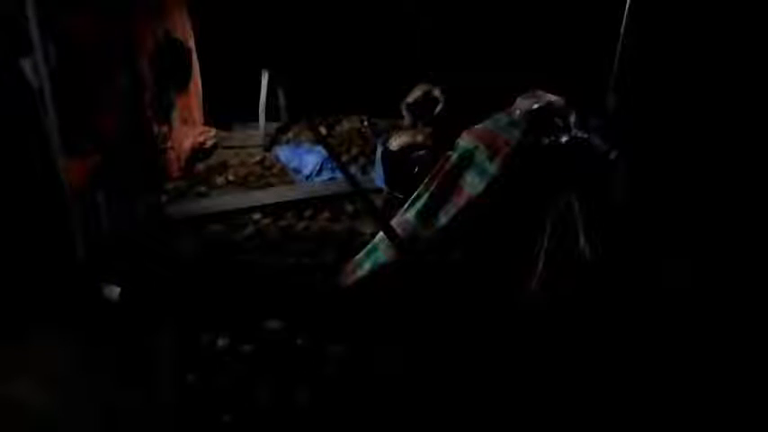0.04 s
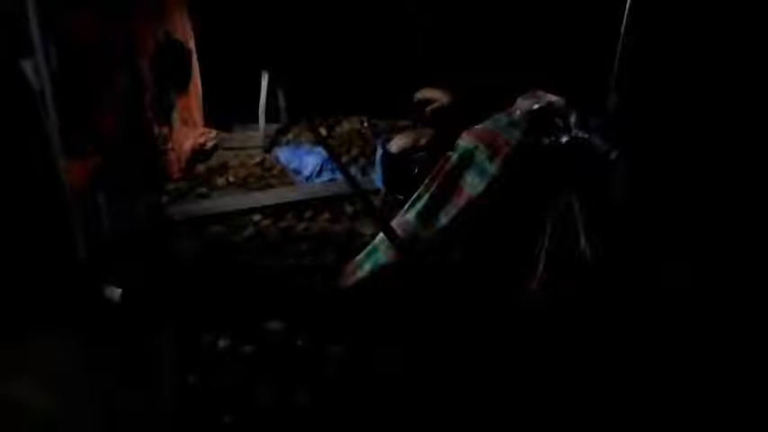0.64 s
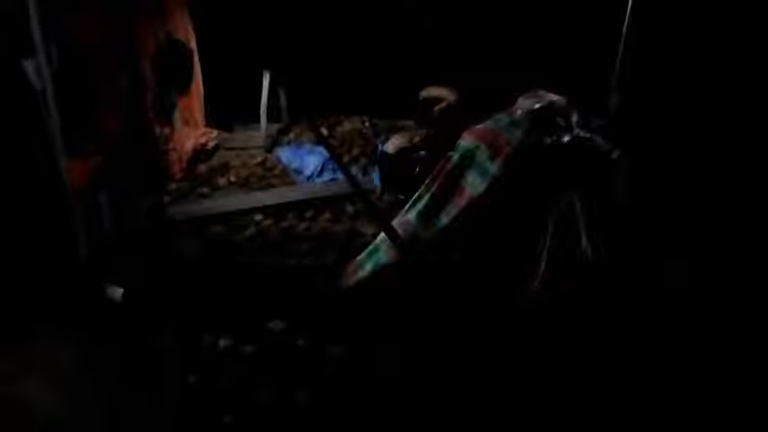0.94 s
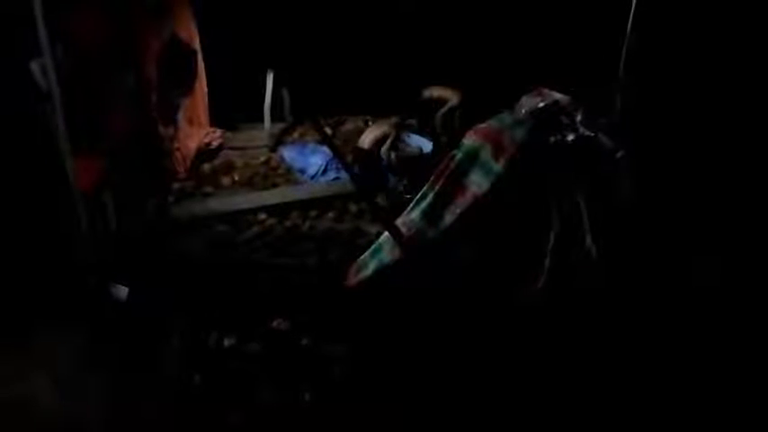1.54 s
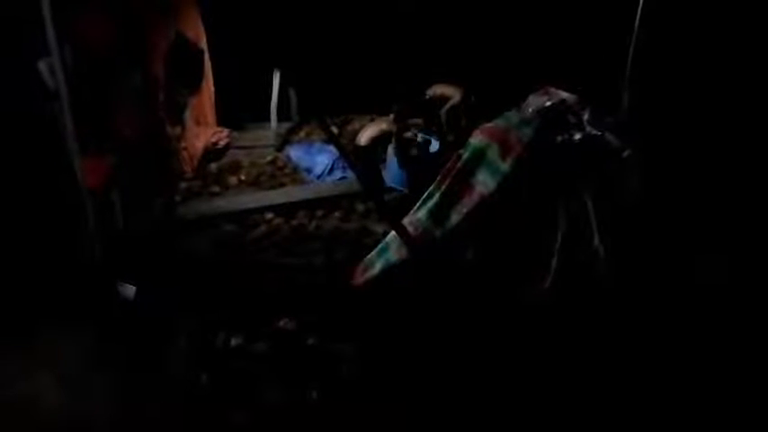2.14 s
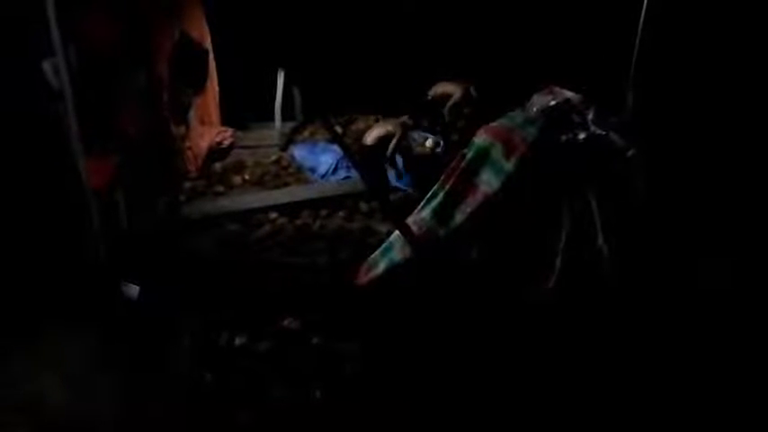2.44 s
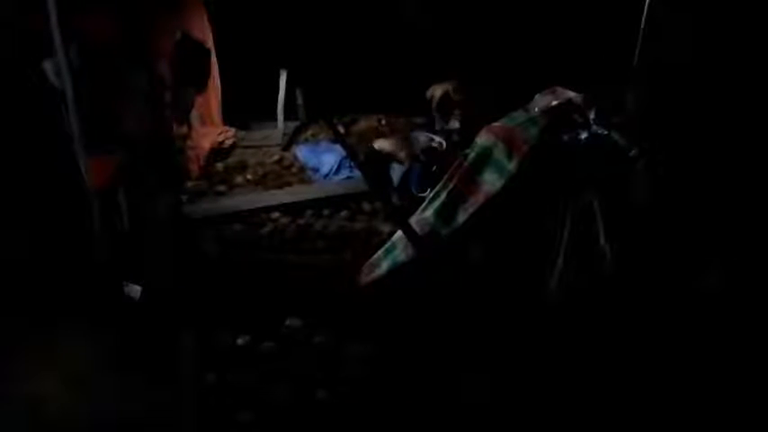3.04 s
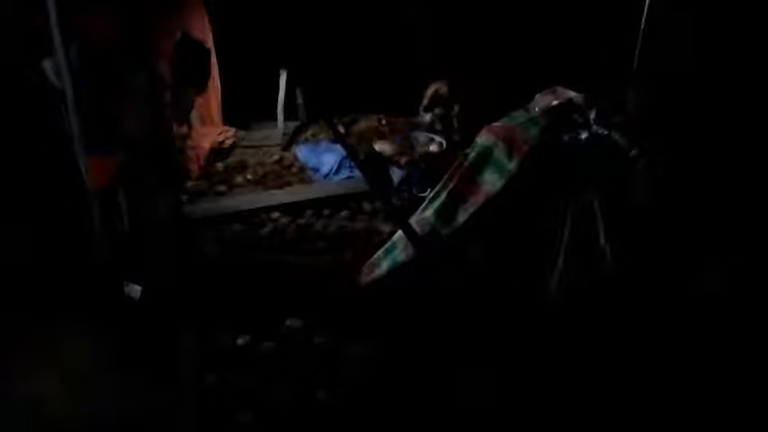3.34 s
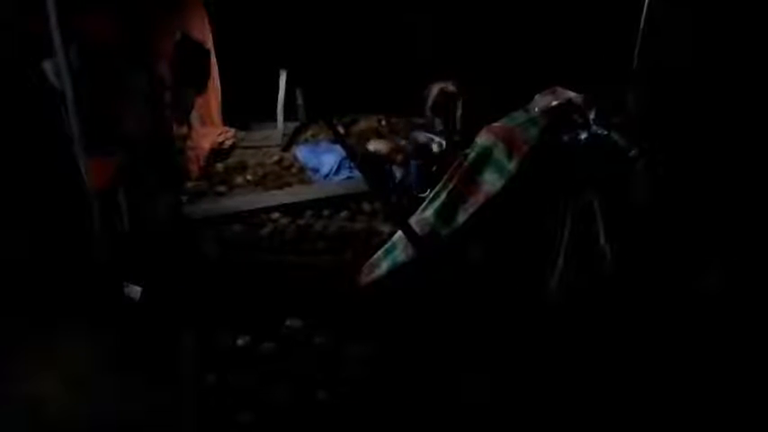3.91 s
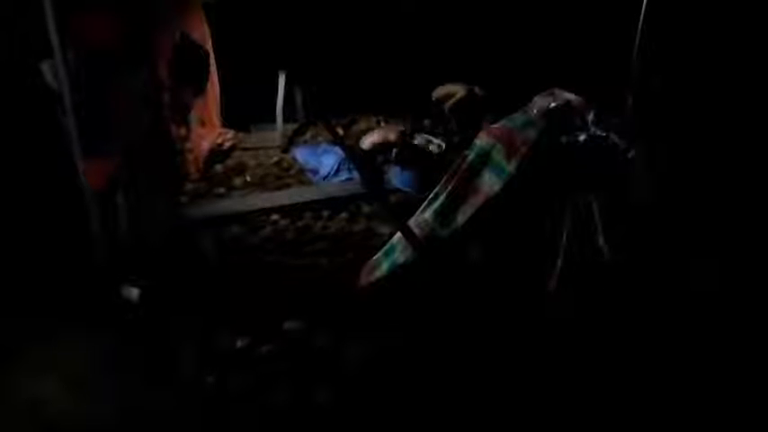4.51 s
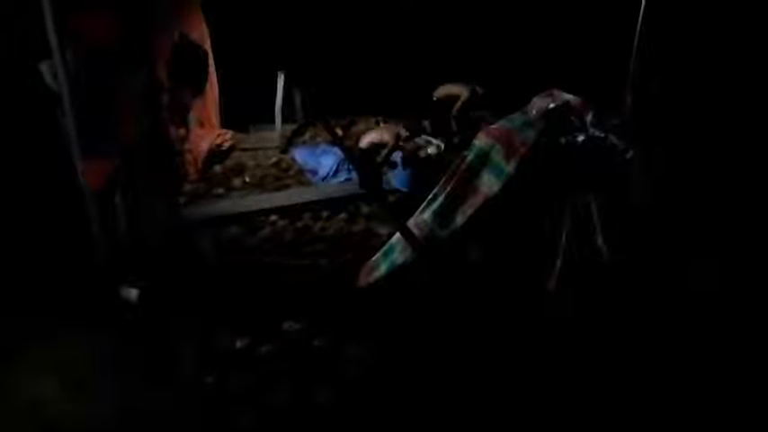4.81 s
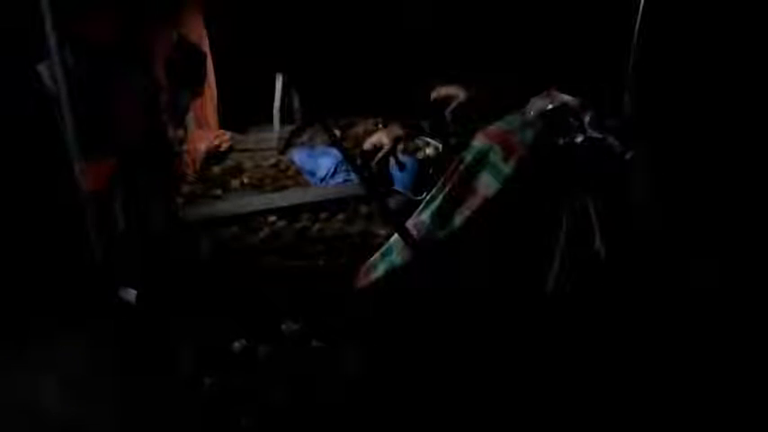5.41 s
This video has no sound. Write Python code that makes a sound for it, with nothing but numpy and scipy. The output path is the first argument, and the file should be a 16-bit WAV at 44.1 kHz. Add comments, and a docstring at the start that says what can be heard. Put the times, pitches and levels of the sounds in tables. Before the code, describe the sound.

Coconuts land on a heap with dull thuds and hollow knocks, over faint crickets and frogs at night.

```python
"""Coconuts on a heap at night

Coconuts are tossed onto a heap in a yard: one lands close on the left, bounces and rolls; others
knock farther off. Each blow is a dull husk thud and a hollow shell knock that jostles the heap and
echoes; dry fibre scuffs in between. Crickets, frogs and a bush cricket call over a faint hum.
An electrical buzz sits on the right, and the loudest blows overload."""
import sys
import numpy as np
from scipy import signal
from scipy.fft import rfft, irfft, next_fast_len
from scipy.io import wavfile
from scipy.ndimage import map_coordinates

SR = 44100
rng = np.random.default_rng(int(sys.argv[2]) if len(sys.argv) > 2 else 0)


def persist_wave(psi):
    """Save psi, clipped to +-1, as 16-bit WAV."""
    counts = np.round(np.clip(psi, -1, 1) * 32767).astype(np.int16)
    wavfile.write(sys.argv[1], SR, np.atleast_2d(counts).T)


N = 249606
TIME = np.arange(N) / SR

# Landings and bounces. Each row: start in seconds, force in dB, husk pitch in Hz, shell pitch in Hz,
# hardness as shell over husk in dB, contact time in seconds.
BLOWS = [(0.1927, -34.5, 229, 553, 7, 0.0057), (0.2015, -23, 141, 423, -15.5, .006),
         (0.223, -38, 242, 818, -1.5, 0.0064), (0.479, -44.5, 188, 657, 8.5, 0.0048),
         (1.143, -34.5, 296, 494, -39, 0.0072), (1.248, -27.5, 325, 605, -11.5, .006),
         (1.5, -27.5, 402, 547, -4, 0.0056), (1.5158, -9, 243.7, 633.6, -3, 0.0051),
         (1.5231, -13, 268, 724, -5.5, 0.0067), (1.535, -26.5, 325, 710, 5, 0.0075),
         (1.5627, -11, 250, 604, -4, 0.0031), (1.6321, -10, 219, 668, 1.5, 0.0035),
         (1.6362, -9, 172, 595, -3.5, 0.0042), (1.648, -22.5, 316, 709, 4, 0.0063),
         (1.832, -34, 185, 484, -6.5, 0.01), (1.94, -23.5, 199, 486, -14.5, 0.0062),
         (1.994, -27.5, 222, 408, -14.5, 0.0042), (2.024, -33.5, 183, 413, -23, 0.005),
         (2.124, -33, 140, 590, -16, 0.0053), (2.166, -30, 173, 440, -22, 0.0052),
         (2.308, -34, 157, 714, -20.5, 0.0057), (2.408, -41.5, 150, 450, -24, 0.0064),
         (2.458, -36, 142, 501, -25, 0.0063), (2.521, -38.5, 133, 630, -8, 0.0057),
         (2.979, -38, 400, 515, 4, .0045), (3.002, -42.5, 382, 647, -0.5, 0.0045),
         (3.059, -44.5, 297, 730, 1, 0.0051), (3.1, -50, 326, 690, 4, 0.0036),
         (3.183, -39.5, 262, 553, -7, 0.0048), (3.209, -41.5, 280, 526, -14, 0.0044),
         (3.746, -38.5, 123.8, 586, 0.5, 0.0048), (3.93, -39, 218, 590, -2.5, 0.0032),
         (3.955, -49.5, 208, 702, 1.5, 0.0076), (5.316, -47, 264, 441, -13, 0.0085)]
# The shell's overtones. Each row: ratio to the shell pitch, relative level in dB.
SHELL_MODES = [(1.42, -8), (1.829, -11.5)]
# Neighbouring shells. Each row: resonance in Hz, width in Hz, relative level in dB.
NEIGHBOUR_SHELLS = [(883, 14, 10.5), (1435, 260, 4), (1767, 156, 5.5), (1930, 240, -1), (2300, 130, -39)]
# Air spaces and shells ringing in the heap. Each row: pitch in Hz, relative level in dB.
HOLLOWS = [(191, -15), (291, -14), (335, -16), (403, -12), (491, -13), (683, -8), (762, -16), (845, -10),
           (912, -14), (945, -17), (1022, -15), (1161, -14), (1262, -14.5), (1630, -20)]
# Dry knocks of bare shell and stalk. Each row: start in seconds, pitch in Hz, relative level in dB.
CLACKS = [(0.475, 3200, -34), (0.477, 1510, -38), (1.502, 1600, -32), (1.521, 1140, -17.5),
          (1.547, 1230, -28), (1.566, 1214, -22), (1.633, 1078, -9), (1.635, 1840, -17), (2.519, 3250, -35),
          (2.545, 3390, -39), (3.715, 1560, -16), (3.7229, 1615, -22), (4.654, 1310, -35),
          (4.693, 2570, -35.5), (4.696, 1310, -34), (4.812, 1400, -43), (4.833, 1590, -39.5)]
# The ring of a clack. Each row: ratio to its pitch, relative level in dB.
CLACK_MODES = [(1.002, -8.5), (1.109, -8.5), (1.27, -22), (1.38, -23.5), (2.05, -30)]
# Nuts rolling to rest. Each row: start and length in seconds, pitch in Hz, relative level in dB.
ROLLS = [(2.049, 0.59, 219.6, -39.5), (3.019, 0.32, 465.4, -45), (5.325, 0.25, 295, -68)]
# Husks sliding on each other. Each row: start and length in seconds, relative level in dB,
# pitch of the rubbed shell in Hz, its ring over the fibre hiss in dB.
SCUFFS = [(0.269, 0.078, -54.5, 1360, 0), (0.466, 0.15, -52, 1500, -25), (0.743, .04, -64, 1550, 12),
          (1.003, 0.038, -57, 960, 13), (1.277, 0.11, -54, 1410, -2), (1.529, 0.045, -32, 990, 4),
          (1.629, 0.027, -29, 1070, 1), (2.045, 0.043, -56.5, 1720, 10), (2.301, 0.043, -55.5, 1880, 5),
          (2.504, 0.09, -48, 2880, -16), (2.818, .02, -59, 1660, 12), (2.982, 0.26, -54.5, 960, -2),
          (3.188, 0.087, -54.5, 1670, 10), (3.435, .025, -58, 1700, 8), (3.697, .025, -45, 2230, 13),
          (3.713, 0.045, -36.5, 1810, -8.5), (4.652, 0.055, -41, 1276, 10), (4.654, 0.031, -49.5, 580, 17),
          (4.688, 0.17, -50.5, 2550, -21), (4.95, 0.028, -62, 1600, 8), (5.017, 0.028, -57, 1000, 8),
          (5.13, 0.03, -60.5, 1510, 4), (5.332, 0.12, -53.5, 3170, -15)]
# The heap giving way. Each row: middle and length in seconds, relative level in dB.
SETTLES = [(0.227, 0.16, -41), (1.179, 0.12, -42.5), (1.78, 0.25, -52), (1.988, 0.085, -33),
           (2.432, 0.38, -50.5), (3.366, 0.24, -53.5), (3.816, 0.23, -49.5), (5.392, 0.14, -52)]
# Nearer callers. Each row: middle and length in seconds, pitch and width in Hz, relative level in dB.
CRICKET_TRILLS = [(0.36, 0.074, 5790, 150, -55.5), (0.64, 0.11, 6080, 130, -52),
                  (1.19, 0.12, 6060, 150, -60), (1.38, 0.39, 5950, 139, -57),
                  (3.86, 0.12, 6130, 130, -53.5), (3.99, 0.042, 6140, 130, -54),
                  (4.29, 0.042, 6120, 150, -55), (4.88, 0.25, 6040, 200, -56)]
FROG_CALLS = [(0.2, 0.12, 2420, 140, -53), (0.355, 0.058, 2400, 110, -51), (2.52, 0.26, 2373, 200, -56),
              (3.18, 0.22, 2403, 80, -52.5), (3.38, 0.18, 2410, 90, -54), (3.86, 0.28, 2230, 170, -52.5),
              (4.41, 0.071, 2380, 149, -53), (4.76, 0.22, 2326, 250, -53.5), (5.52, 0.36, 2304, 260, -51.5)]
# Bush cricket strokes. Each row: start in seconds, pitch in Hz, relative level in dB,
# brightness of the scrape in dB per octave.
WING_STROKES = [(0.069, 10950, -56.5, -4), (1.927, 10740, -54, 1), (3.684, 10800, -51, 3),
                (5.375, 10770, -53.5, 3)]
# Low background tones. Each row: pitch in Hz, relative level in dB.
DRONE_TONES = [(61, -59.5), (183.5, -66), (281, -65)]
MAINS_HARMONICS = [(200, -66.5), (300, -64.5), (400, -67.5), (500, -69)]
# The drone's swelling tone. Each row: time in seconds, relative level in dB.
DRONE_SWELL = [(0, -61), (0.7, -55.5), (1.3, -57.5), (3.7, -56), (4.2, -63), (5.1, -73), (5.5, -58.5)]

# Tone colours. Each row: frequency in Hz, relative spectral level in dB.
SNAP_COLOUR = [(200, -22.5), (800, 3), (1900, -9), (2600, -15.5), (6000, -26.5), (15000, -42)]  # husk fibres breaking
JOSTLE_COLOUR = [(30, -1.5), (80, -1), (150, 7.5), (400, 5.5), (700, -5), (1000, -12), (1500, -45),
                 (2500, -23.5), (6000, -50)]  # the shaken heap
CRACK_COLOUR = [(500, -4), (3300, 7.5), (6000, -7), (14000, -13)]  # the edge of a clack
FIBRE_COLOUR = [(300, 12), (900, 10.5), (1600, 7), (2300, 10), (3300, 9), (4000, 0.5), (5000, 2.5),
                (6500, -16), (9000, -15), (15000, -24)]  # husk rubbing husk
STIR_COLOUR = [(200, -23.5), (600, 0.5), (1000, -6), (1700, 2), (2100, -7.5), (3200, -5), (4500, -7),
               (9000, -32)]  # loose husks rustling
RUMBLE_COLOUR = [(20, -8), (40, -7.5), (70, 4), (110, -2), (200, -3), (700, -25), (4000, -49.5)]  # the settling heap
RASP_COLOUR = [(6000, -40), (8200, -12), (9500, -3), (10700, 0.5), (11500, -4), (12500, -16), (14600, -14)]  # a scraping wing
AIR_COLOUR = [(20, -50), (100, -46), (320, -10.5), (600, -7), (1000, -7.5), (1800, -16), (3100, -13.5),
              (4000, -21), (5000, -19.5), (7400, -11), (8000, -21.5), (9200, -17), (11400, -29.5),
              (12200, -32.5), (15000, -32.5)]  # outdoor hiss
BUZZ_COLOUR = [(300, -41.5), (1400, -26), (2500, -8), (3300, 4), (3900, -19.5), (4900, 2.5), (6000, -5.5),
               (6800, -47), (8000, -24), (11000, -13), (15000, -36)]  # electrical ticks
# Where the hiss sits. Each row: frequency in Hz, left over right in dB.
AIR_BALANCE = [(100, 84.5), (500, 5.5), (1200, -4.5), (3000, 7.5), (4500, -15), (7300, 3), (12000, -1.5)]
# The length of the yard's echo. Each row: frequency in Hz, seconds to fall by 60 dB.
YARD_DECAY = [(100, 0.35), (260, 0.61), (700, 0.38), (1800, 0.44), (5000, 1), (12000, 0.41)]
# The tone of that echo. Each row: frequency in Hz, gain in dB.
YARD_COLOUR = [(40, -3), (150, -3), (300, -10), (700, 1), (1500, 1), (4000, -5), (12000, 1.5)]


def coconuts():
    """Every landing, clack and roll, placed in the yard."""
    out = np.zeros((2, N))
    for start, *contact in BLOWS:
        add(out, start, place(blow(*contact)))
    for start, hz, db in CLACKS:
        add(out, start, amp(db) * place(clack(hz), left_db=28.5, echo_left_db=9, wet_db=-11))
    for start, length, hz, db in ROLLS:
        add(out, start, amp(db) * place(roll(length, hz), wet_db=-12))
    return out


def blow(force_db, husk_hz, shell_hz, hardness_db, contact_s, hard_blow_db=-7.5, hollow_t60_s=0.21):
    """One contact: the soft husk thuds, the hard shell knocks, the neighbours shake and rattle."""
    t = np.arange(SR // 3) / SR
    hardness = amp(hardness_db)
    husk = amp(4.5) * swell(t, contact_s, 1.57) * np.sin(2 * np.pi * husk_hz * t)
    shell = amp(4.5) * hardness * swell(t, 0.8 * contact_s, 1.57) * np.sin(2 * np.pi * shell_hz * t)
    # it takes a hard blow to bring out the fibre snap, overtones, hollows and loose nuts in full
    violence = amp(1.46 * min(force_db - hard_blow_db, 0))
    snap = amp(-22.5) * hardness * swell(t, 0.00066, 0.5) * noise(SNAP_COLOUR, len(t))[0]
    modes = sum(amp(db) * np.sin(2 * np.pi * ratio * shell_hz * t) for ratio, db in SHELL_MODES)
    overtones = hardness * swell(t, 0.0058, 0.93) * modes
    hollows = sum(amp(db) * np.sin(2 * np.pi * (hz * t + rng.random())) for hz, db in HOLLOWS)
    hollows *= amp(-60 * t / hollow_t60_s) * (1 - np.exp(-t / 0.0063))
    rattle = amp(-8) * hardness * roll(length_s=0.085, hz=1070, bump_s=0.0016, count=12)[:len(t)]
    neighbours = unit(filtered(rng.standard_normal(len(t)), neighbour_response))
    clatter = amp(-13.5) * hardness * swell(t, 0.9 * contact_s, 0.69) * neighbours
    shake = jostle(t, husk_hz, hardness_db)
    return amp(force_db) * (husk + shell + clatter + shake
                            + violence * (snap + overtones + hollows + rattle))


def neighbour_response(hz):
    """The surrounding shells act as a bank of resonant filters."""
    return sum((-1) ** k * amp(db) * 1j * hz * width / (centre ** 2 - hz ** 2 + 1j * hz * width)
               for k, (centre, width, db) in enumerate(NEIGHBOUR_SHELLS))


def jostle(t, husk_hz, hardness_db):
    """The shock spreads through the heap and outlasts the blow; dull when only the husk is struck."""
    def reach(f):
        return amp(-11) / (1 + (f / (2 * husk_hz)) ** 4) + amp(hardness_db - 3.5) * f / (f + 300)
    return swell(t, 0.012, 0.55) * filtered(noise(JOSTLE_COLOUR, len(t))[0], reach)


def clack(hz, crack_db=-24):
    """Bare shell or stalk: a dry crack and a few close modes that die almost at once."""
    t = np.arange(SR // 10) / SR
    ring = sum(amp(db) * np.sin(2 * np.pi * (ratio * hz * t + rng.random()))
               for ratio, db in CLACK_MODES)
    crack = amp(crack_db) * noise(CRACK_COLOUR, len(t))[0]
    return swell(t, 0.0029, 0.94) * (ring + crack)


def roll(length_s, hz, bump_s=0.0082, count=22, fade_db=18):
    """Small bumps of uneven pitch and size that fade as the nut comes to rest."""
    t = TIME[:max(SR // 3, int((length_s + 10 * bump_s) * SR))]
    progress = (np.arange(count) + rng.random(count)) / count
    bump_hz = hz * np.exp(rng.normal(0, 0.24, count))
    size_db = rng.normal(0, 1.5, count)
    since = t - length_s * progress[:, None]
    bumps = swell(since, bump_s, 0.93) * np.sin(2 * np.pi * bump_hz[:, None] * since)
    return amp(size_db - fade_db * progress) @ bumps


def heap():
    """Husks scuff and stir; the heap rumbles softly as it settles."""
    rustle = noise(STIR_COLOUR) * amp(-62 + 3.2 * wobble(22))
    for start, length, db, hz, ring_db in SCUFFS:
        add(rustle, start, amp(db) * scuff(length, hz, ring_db))
    low = noise(RUMBLE_COLOUR)
    low = unit(low[0] + 0.22 * low)  # nearly the same on both sides
    settling = amp(-60) + sum(amp(db) * hump(middle, length) for middle, length, db in SETTLES)
    rumble = settling * amp(-1 + 1.2 * wobble(33)) * low
    return pan(left_db=16.5) * rustle + pan(left_db=14.5) * rumble


def scuff(length_s, hz, ring_db, grain_db=2.5, sharpness=2.25):
    """Fibres catch and slip in dense bursts that hiss and ring the rubbed shell."""
    slips = rng.standard_normal((2, SR)) * amp(grain_db * wobble(650, SR))
    hiss = unit(filtered(slips, lambda f: amp(along(FIBRE_COLOUR, f))))
    ring = unit(filtered(slips, lambda f: 1 / (1 + 1j * sharpness * (f / hz - hz / (f + 1))) ** 2))
    return swell(TIME[:SR], length_s / 3, 0.53) * unit(hiss + amp(ring_db) * ring)


def wildlife():
    """Crickets, frogs and a bush cricket, all off to the left."""
    crickets = chorus(CRICKET_TRILLS, 6036, far_db=-63.5, width_hz=220, flutter_db=1.5, flutter_rate=16)
    frogs = chorus(FROG_CALLS, 2420, far_db=-60, width_hz=270, flutter_db=2, flutter_rate=25)
    return pan(left_db=10.5) * amp(-1) * (crickets + frogs) + pan(left_db=14) * bush_cricket()


def chorus(calls, far_hz, far_db, width_hz, flutter_db, flutter_rate, wander_hz=45):
    """Far callers blur into one wandering band; nearer ones swell out of it on their own pitches."""
    far = amp(far_db) * band(far_hz + wander_hz * wobble(7), width_hz)
    near = sum(amp(db) * hump(middle, length) * band(hz, width)
               for middle, length, hz, width, db in calls)
    return amp(flutter_db * wobble(flutter_rate)) * (far + near)


def bush_cricket(sag_hz_per_s=470):
    """Each wing stroke starts on a thin, sagging tone and spreads into a lingering rasp."""
    out = np.zeros((2, N))
    for start, hz, db, tilt_db in WING_STROKES:
        pitch = hz - sag_hz_per_s * np.clip(TIME - start, 0, 0.2)
        out += amp(db - 3.5) * swell(TIME - start, 0.022, 0.55) * band(pitch, width_hz=280)
        scrape = noise([(f, level + tilt_db * np.log2(f / hz)) for f, level in RASP_COLOUR], SR)
        add(out, start + 0.011, amp(db) * swell(TIME[:SR], 0.038, 0.75) * scrape)
    teeth = unit(amp(3 * wobble(300)))  # the teeth of the wing catch unevenly
    return teeth * out


def night_bed(swell_hz=124.3):
    """Soft outdoor hiss, a distant drone with one tone that comes and goes, and faint mains hum."""
    sides = np.array([[0.5], [-0.5]])
    air = filtered(noise(AIR_COLOUR), lambda f: amp(along(AIR_BALANCE, f) * sides))
    air *= amp(-56 + 0.5 * wobble(4))
    swell_gain = amp(np.interp(TIME, *np.transpose(DRONE_SWELL)))
    drone = tones(DRONE_TONES) + swell_gain * tones([(swell_hz, 0)])
    return air + pan(left_db=11.5) * drone + pan(left_db=-26) * tones(MAINS_HARMONICS)


def electrical_buzz(rate_hz=60.96):
    """Sharp, regular electrical ticks, hard right."""
    ticks = np.diff(np.floor(TIME * rate_hz), prepend=0)
    buzz = unit(filtered(ticks, lambda f: amp(along(BUZZ_COLOUR, f))))
    return amp(-66) * np.array([[0], [2]]) * buzz


def place(sound, left_db=14, echo_left_db=14, wet_db=-2, left_lag_s=0.0001):
    """Set a sound on the left, followed by its own echoes."""
    sound = np.pad(sound, (0, SR // 2))
    direct = filtered(sound, lambda f: np.array([np.exp(-2j * np.pi * f * left_lag_s), np.ones_like(f)]))
    return pan(left_db) * direct + amp(wet_db) * pan(echo_left_db) * yard_echo(sound)


def yard_echo(x, delay_s=0.0108, build_s=0.00067):
    """Scattered echoes from the heap, ground and walls; each band dies at its own pace."""
    hz, t, spectrum = signal.stft(rng.standard_normal((2, SR * 3 // 4)), SR, nperseg=256)
    decay = amp(-60 * t / along(YARD_DECAY, hz)[:, None])
    tail = signal.istft(spectrum * decay, SR, nperseg=256)[1]
    since_arrival = np.maximum(TIME[:tail.shape[1]] - delay_s, 0)
    tail *= 1 - np.exp(-since_arrival / build_s)
    tail = filtered(tail / np.linalg.norm(tail[0]), lambda f: amp(along(YARD_COLOUR, f)))
    return signal.fftconvolve(x[None], tail, axes=1)[:, :len(x)]


def tones(rows):
    """Sines that waver slightly in level and phase."""
    return sum(amp(db + 1.5 * wobble(6)) * np.sqrt(2) * np.sin(2 * np.pi * hz * TIME + 0.5 * wobble(8.2))
               for hz, db in rows)


def noise(colour, size=N):
    """Wide stereo noise of a given colour, at rms 1."""
    return unit(filtered(rng.standard_normal((2, size)), lambda f: amp(along(colour, f))))


def band(hz, width_hz):
    """Narrow-band stereo noise around a steady or gliding pitch, at rms 1."""
    drift = filtered(rng.standard_normal((2, 2, N)), lambda f: 1 / (1 + (2 * f / width_hz) ** 2))
    phase = 2 * np.pi * np.cumsum(hz * np.ones(N)) / SR
    return unit(drift[0] * np.cos(phase) + drift[1] * np.sin(phase))


def swell(t, peak_s, power):
    """Rises to 1 at peak_s and dies away; a higher power gives a tighter pulse."""
    u = np.maximum(t, 0) / peak_s
    return (u * np.exp(1 - u)) ** power


def hump(middle_s, length_s):
    """A rounded fade in and out, 1 in its middle."""
    return np.exp(-1.02 * (2 * (TIME - middle_s) / length_s) ** 2)


def wobble(rate, size=N):
    """A smooth random curve through rate points a second."""
    return map_coordinates(rng.standard_normal(int(size * rate / SR) + 4), [TIME[:size] * rate])


def filtered(x, response):
    """Shape x with a frequency response."""
    n = x.shape[-1]
    padded = next_fast_len(n + 8192)
    return irfft(rfft(x, padded) * response(np.fft.rfftfreq(padded, 1 / SR)), padded)[..., :n]


def along(points, hz):
    """Read a curve on a log frequency axis."""
    freqs, values = np.transpose(points)
    return np.interp(np.log(hz + 1), np.log(freqs + 1), values)


def pan(left_db):
    """Left and right gains with a mean of 1."""
    gains = amp([[left_db / 2], [-left_db / 2]])
    return gains / gains.mean()


def add(track, start_s, x):
    """Mix x into the track."""
    i = round(start_s * SR)
    track[:, i:i + x.shape[1]] += x[:, :N - i]


def amp(db):
    """Decibels to gain."""
    return 10 ** (np.asarray(db) / 20)


def unit(x):
    """Scale to rms 1."""
    return x / np.sqrt(np.mean(x ** 2) + 1e-20)


def scene():
    """The whole yard in stereo."""
    return coconuts() + heap() + wildlife() + night_bed() + electrical_buzz()


def record(dry, threshold=0.78, depth=0.77, release_s=1.0, attack_s=0.04, top_hz=15100):
    """Loud blows duck the gain for a while, their first cycles clip, and the top is cut."""
    overshoot = np.maximum(np.log(np.abs(dry).max(0) / threshold + 1e-9), 0)
    fade = np.exp(-TIME / release_s)
    held = np.maximum.accumulate(overshoot / fade) * fade
    step = 1 / (attack_s * SR)
    ducked = dry * np.exp(-depth * signal.lfilter([step], [1, step - 1], held))
    return filtered(np.clip(ducked, -1, 1), lambda f: 1 / (1 + (f / top_hz) ** 120))


dry = scene()
out = record(dry)
persist_wave(out)
```